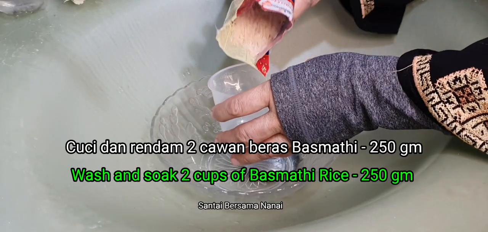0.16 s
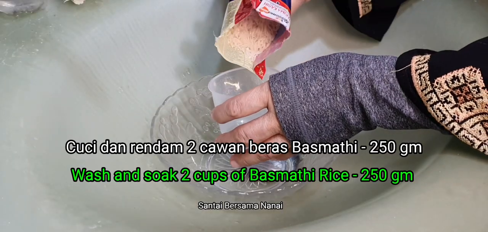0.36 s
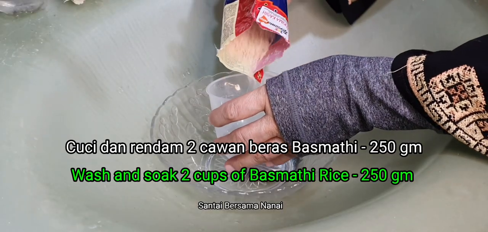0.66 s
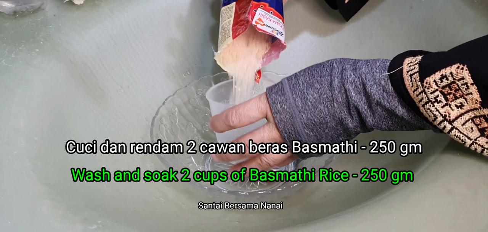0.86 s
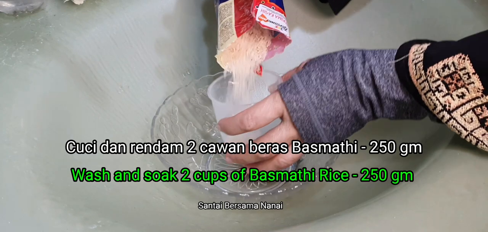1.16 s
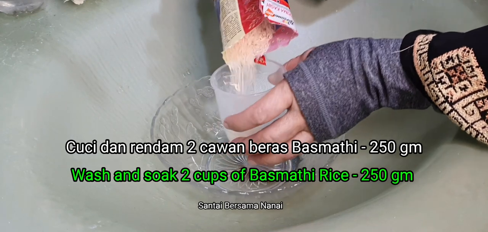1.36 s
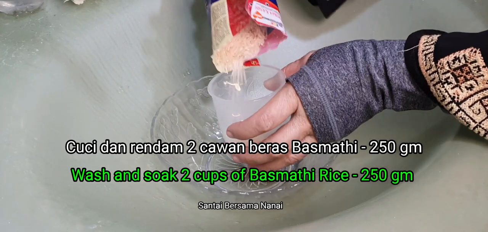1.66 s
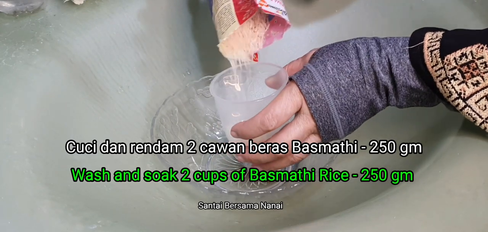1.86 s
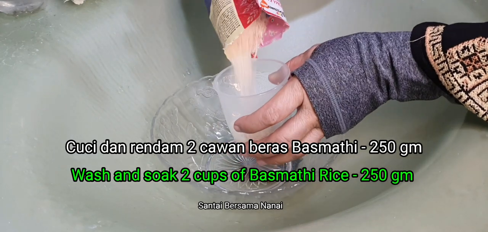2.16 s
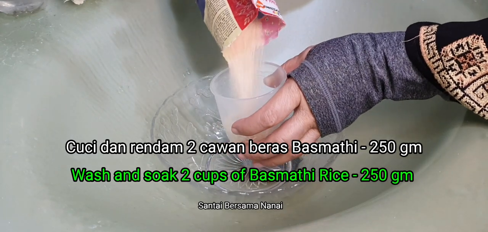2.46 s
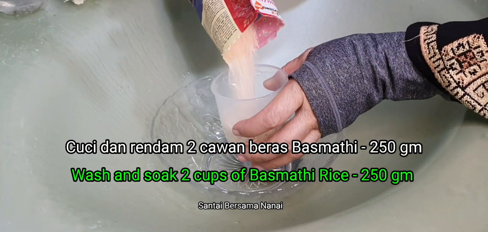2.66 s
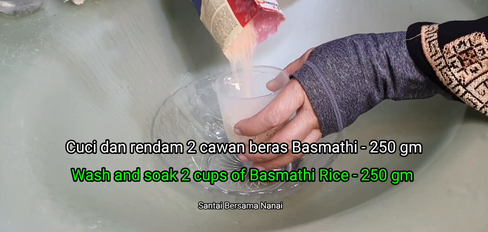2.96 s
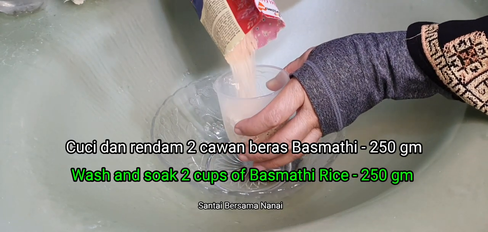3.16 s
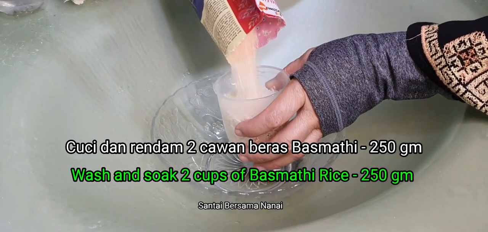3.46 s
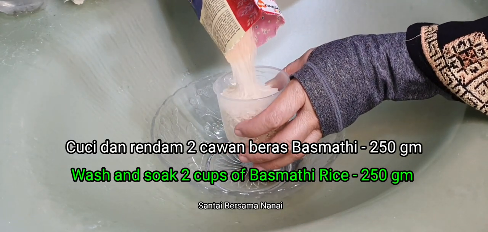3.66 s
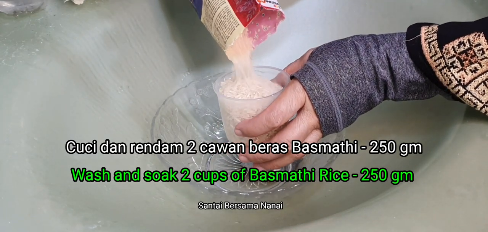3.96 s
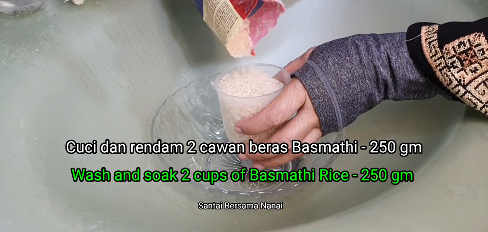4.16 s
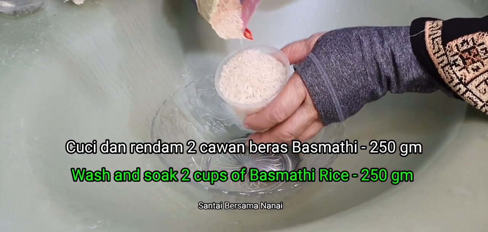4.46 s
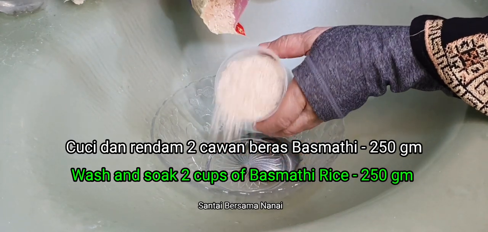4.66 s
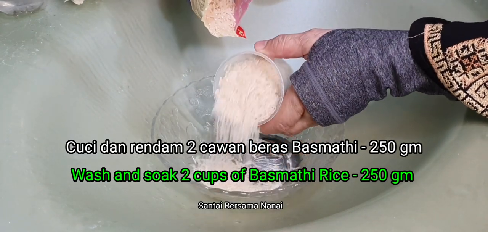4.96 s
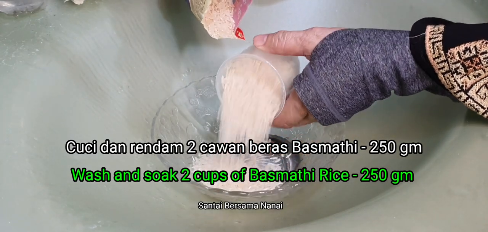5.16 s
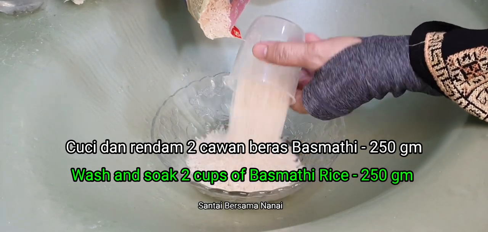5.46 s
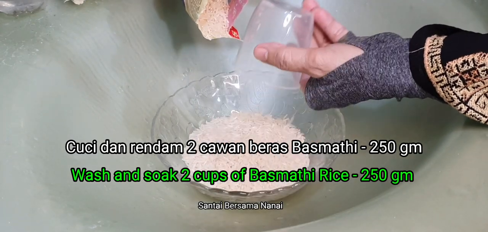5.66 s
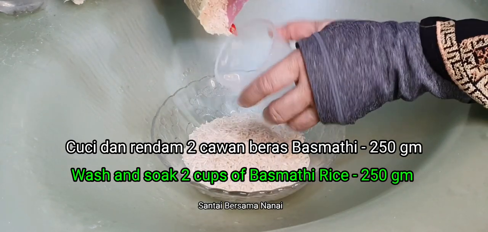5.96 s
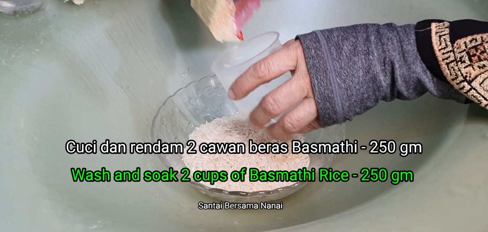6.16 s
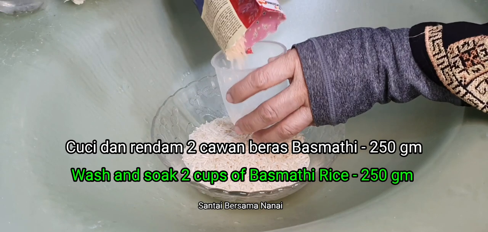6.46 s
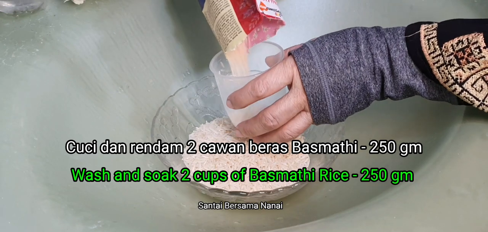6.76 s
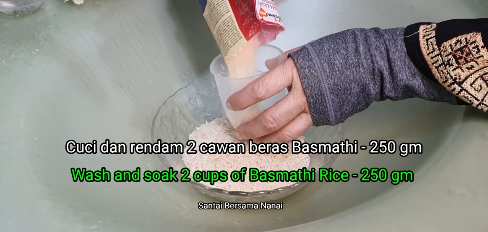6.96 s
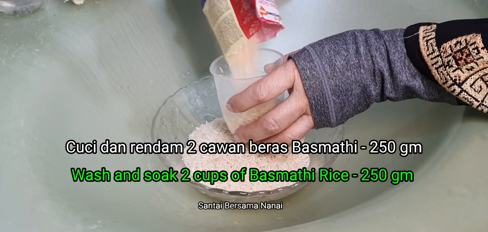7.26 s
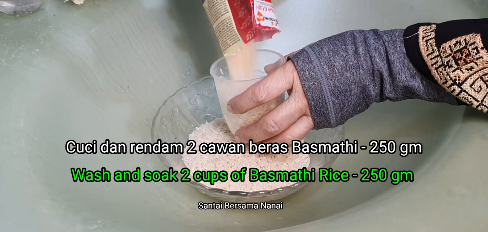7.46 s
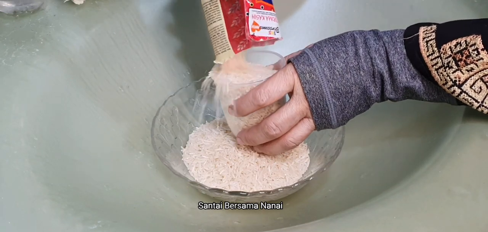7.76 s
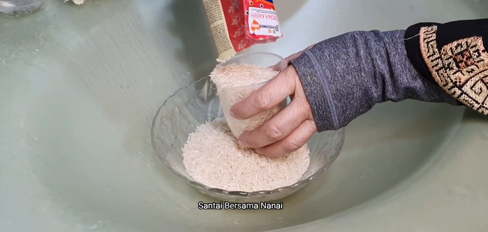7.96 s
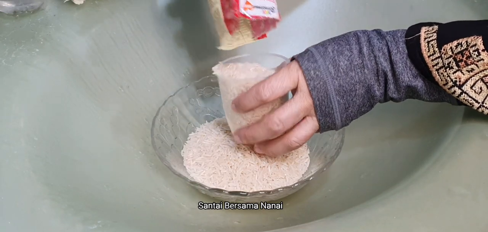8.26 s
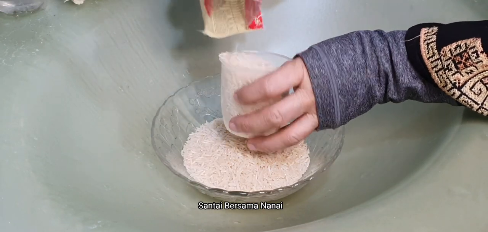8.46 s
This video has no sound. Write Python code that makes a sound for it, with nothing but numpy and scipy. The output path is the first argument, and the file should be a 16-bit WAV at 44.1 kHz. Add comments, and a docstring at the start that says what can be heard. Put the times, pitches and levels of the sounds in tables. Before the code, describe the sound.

Over a steady low hum, rice grains clatter into an empty plastic cup, settle to a hiss, spill into glass, then fill the cup again.

```python
"""Dry rice slides out of a cardboard box into a plastic cup held over a glass bowl in a kitchen basin.
The first grains ring the empty cup, later ones hiss on the heap; the cup is tipped into the bowl and filled again.
Random impacts excite resonators for cup, box and glass, and the basin adds early reflections.
Clumps, lone grains, snaps and knocks are placed singly; a mains hum of three sines and shaped room noise lie below."""
import sys
import numpy as np
from scipy import signal
from scipy.fft import rfft, irfft
from scipy.io import wavfile

SR = 44100
rng = np.random.default_rng(int(sys.argv[2]) if len(sys.argv) > 2 else 0)


def unload_wav(signal):
    """Save mono or channel-first audio to the path in sys.argv[1] as 16-bit WAV at rate SR, clipped to [-1, 1]."""
    wavfile.write(
        sys.argv[1],
        SR,
        np.round(np.clip(np.atleast_2d(signal).T, -1, 1) * 32767).astype(np.int16),
    )


N = 380141

# Spectrum of rice striking rice. Each row: frequency in Hz, relative density in dB per Hz.
RICE_SPECTRUM = [(500, -43.5), (900, -12), (2000, -2), (3800, 0.5), (5200, 0.5), (7000, 4), (8600, 5),
                 (10500, -1.5), (11500, -5.5), (12200, -7)]
# Rice shifting in the box and packing in the cup. Each row: time in seconds, level in dB.
RUSTLE_LEVEL = [(0, -48.5), (.16, -46.5), (.47, -55), (.85, -48), (1.55, -49.5), (1.83, -83), (2.19, -53.5),
                (2.61, -47), (3.18, -54), (3.6, -46), (4.22, -58), (4.38, -69.5), (5.04, -59.5),
                (6.56, -62.5), (7.01, -40.5), (7.33, -43), (7.74, -38.5), (8, -45), (8.12, -63),
                (8.45, -56.5), (8.62, -60.5)]
# Rice on the bare cup floor: first filling, second filling, emptying. Each row: time in seconds, level in dB.
RATTLE_LEVELS = [
    [(.9, -76), (.975, -49), (1.0, -35), (1.05, -29), (1.14, -18.5), (1.2, -25), (1.34, -33), (1.65, -50.5),
     (2.1, -76.5)],
    [(6.3, -73), (6.56, -46), (6.71, -37.5), (6.76, -21.5), (6.88, -36.5), (7.05, -34.5), (7.19, -49),
     (7.26, -77)],
    [(4.85, -68), (4.97, -49.5), (5.3, -55.5), (5.6, -51.5), (5.85, -67)],
]


def amp(db):
    """Level law: 20 dB is a factor of ten in amplitude."""
    return 10 ** (np.asarray(db) / 20)


def rms_one(x):
    """Normalization: the mean of the channels gets an effective value of 1."""
    mono = np.mean(np.atleast_2d(x), axis=0)
    return x / np.sqrt(np.mean(mono ** 2) + 1e-20)


def in_time(rows):
    """Envelopes: each column after the time is interpolated linearly to every sample."""
    s, *columns = np.transpose(rows)
    return [np.interp(np.arange(N) / SR, s, column) for column in columns]


def at_hz(points, hz):
    """Spectral envelope: values are interpolated along a logarithmic frequency axis."""
    point_hz, values = np.transpose(points)
    return np.interp(np.log(hz + 1), np.log(point_hz), values)


def sides(db):
    """Level difference between the ears: left and right gains for a lean to the left."""
    return amp(np.multiply.outer([.5, -.5], db))


def together(*levels_db):
    """Power addition: gain of unrelated sounds heard at once."""
    return np.sqrt(sum(amp(2 * db) for db in levels_db))


def drift(rate_hz):
    """Low-passed noise: a slow random fluctuation of effective value 1."""
    step = 40   # samples between the slow values
    r = np.exp(-2 * np.pi * rate_hz * step / SR)
    noise = rng.standard_normal(N // step + 2002)
    slow = signal.lfilter([1], [1, -2 * r, r * r], noise)[2000:]   # without the filter's onset
    return np.interp(np.arange(N) / step, np.arange(len(slow)), rms_one(slow))


def resonance(x, hz, width_hz):
    """Damped resonator: a pole pair whose radius sets the bandwidth."""
    r = np.exp(-np.pi * width_hz / SR)
    zeros = [(1 - r * r) / 2, 0, (r * r - 1) / 2]
    poles = [1, -2 * r * np.cos(2 * np.pi * hz / SR), r * r]
    return signal.lfilter(zeros, poles, x + 1e-18)


def modes(x, table):
    """Modal superposition: broad resonances side by side with alternating sign."""
    return sum((-1) ** k * amp(db) * resonance(x, hz, width_hz) for k, (hz, width_hz, db) in enumerate(table))


def coloured(x, spectrum):
    """Minimum-phase filtering: a causal filter takes the given spectrum."""
    hz = np.linspace(0, SR / 2, 200)
    # the minimum-phase step takes a square root, hence twice the level
    kernel = signal.minimum_phase(signal.firwin2(511, hz, amp(2 * at_hz(spectrum, hz)), fs=SR))
    return signal.oaconvolve(x, kernel[None], axes=1)[:, :N]


def basin(clicks, echo_db, count):
    """Early reflections: every landing spot has its own decaying echoes at either ear."""
    t60_s, right_lag = .042, 3.2   # decay time; lag of the direct sound at the right port in samples
    t = np.arange(int(.08 * SR)) / SR
    spot = rng.integers(0, count, N)
    out = 0
    for k in range(count):
        echoes = rng.standard_normal((2, len(t))) * amp(-60 * t / t60_s) * (t > .0003)
        paths = amp(echo_db) * echoes / np.linalg.norm(echoes, axis=1, keepdims=True)
        paths += np.sinc(t * SR - np.array([[1], [1 + right_lag]]))   # direct sound
        out = out + signal.oaconvolve((clicks * (spot == k))[None], paths, axes=1)[:, :N]
    return out


def grains(per_s, spread_db, clumps_db):
    """Shot noise: random impacts of uneven size and either sign, in clumps of level, land in the basin."""
    born = rng.random(N) < per_s / SR
    sizes = amp(spread_db * np.minimum(rng.exponential(1, N), 4)) * rng.choice([-1, 1], N)
    clumps = amp(clumps_db * (drift(3.3) + drift(21)))
    return basin(born * sizes * clumps, echo_db=5.5, count=7)


def room():
    """Partial coherence: steady rumble and air share more between the ears in the bass than higher up."""
    # Each row: frequency in Hz, relative density in dB per Hz.
    spectrum = [(20, -16), (45, -3), (90, 2), (125, -4), (160, -1), (200, -14), (300, -4), (400, -11.5),
                (800, -7.5), (1250, -11.5), (2000, -20.5), (4200, -39), (7400, -73), (12000, -133)]
    # Likeness of the ears. Each row: frequency in Hz, correlation from -1 to 1.
    likeness = [(30, 0.39), (60, 1), (270, 0.65), (450, 0.36), (900, -0.67), (2500, 0.1)]
    level_db = -46
    hz = np.arange(N // 2 + 1) * SR / N
    mid, side = rfft(rng.standard_normal((2, N))) * amp(at_hz(spectrum, hz))
    alike = np.clip(at_hz(likeness, hz), -1, 1)
    both = np.sqrt(1 + alike) * mid + np.sqrt(1 - alike) * side * [[1], [-1]]
    return amp(level_db) * rms_one(irfft(both, N))


def hum():
    """Harmonic series: multiples 1, 3 and 4 of the mains buzz swell slowly and waver a little."""
    # Each row: time in seconds, level of the fundamental in dB.
    fundamental = [(0, -44), (.7, -41), (1.5, -38), (2.0, -41.5), (2.3, -34.5), (3, -40), (4.2, -43),
                   (5, -51.5), (5.5, -42), (6, -39), (8.62, -32)]
    # Each row: time in seconds, level of multiple 3 in dB, level of multiple 4 in dB.
    overtones = [(0, -45, -101), (3, -47, -71), (6, -47.5, -59.5), (8.62, -50.5, -60.5)]
    # One entry a multiple: left over right in dB.
    leans_db = [3, -1, 7]
    buzz_hz = 100.1
    phase = 2 * np.pi * buzz_hz * np.arange(N) / SR
    out = 0
    for k, db, lean_db in zip([1, 3, 4], in_time(fundamental) + in_time(overtones), leans_db):
        level = np.sqrt(2) * amp(db + 0.13 * drift(14))   # effective value to peak
        out = out + sides(lean_db)[:, None] * level * np.sin(k * phase)
    return out


def knocks():
    """Damped oscillation: dull knocks of the box and hand are decaying sines; the one at 1.506 s has three pitches."""
    # Each row: start in seconds, peak level in dB, pitch in Hz, time to fall by 60 dB in seconds.
    thuds = [(.27, -32.5, 510, 0.044), (1.506, -32, 450, 0.06), (1.507, -31.5, 624, 0.055),
             (1.508, -34.5, 855, 0.028), (1.62, -31.5, 325, 0.044), (3.795, -35, 506, 0.022)]
    out = np.zeros(N)
    t = np.arange(int(.15 * SR)) / SR
    for s, peak_db, hz, t60_s in thuds:
        out[int(s * SR):][:len(t)] += amp(peak_db - 60 * t / t60_s) * np.sin(2 * np.pi * hz * t)
    return out


def bowl():
    """Driven thin modes: grains keep the glass ringing, and the heap damps the high modes more and more."""
    # Rice on the glass, one list a spill. Each row: time in seconds, relative level in dB.
    spills = [
        [(4.9, -93), (4.93, -47), (5.0, -41), (5.2, -49), (5.33, -56.5), (5.58, -47), (5.72, -60), (5.8, -97)],
        [(5.7, -97), (5.8, -60), (5.87, -60.5), (5.96, -92)],
        [(7.92, -109), (8.0, -48), (8.07, -63), (8.16, -63), (8.4, -74)],
    ]
    # Modes of the glass. Each row: frequency in Hz, width in Hz, relative level in dB.
    glass = [(1640, 25, -14), (2800, 40, -10), (3350, 40, -15), (4250, 200, -9), (4460, 30, 0),
             (4650, 30, -5), (4770, 25, -6), (5950, 50, -12), (6730, 40, -7), (6840, 50, -5),
             (7170, 35, -1), (7650, 150, -9), (8020, 35, -2), (8740, 45, -9), (9100, 50, -4),
             (9680, 30, -6), (10200, 60, -5), (10800, 80, -7), (11200, 70, -10)]
    first_damping_db, damping_growth_db = -2, 15.5   # per octave at the start; per octave and second
    blows = grains(3000, spread_db=2.0, clumps_db=0)
    t = np.arange(N) / SR
    states = []
    for rows in spills:
        since_s = np.clip(t - rows[0][0], 0, 1)   # the damping grows for one second
        states.append((in_time(rows)[0], first_damping_db + damping_growth_db * since_s))
    out = 0
    for hz, width_hz, db in glass:
        octaves = np.log2(hz / 4500)
        level = sum(amp(level_db - damping_db * octaves) for level_db, damping_db in states)
        swell = amp(db - 8 + 2.3 * drift(11))
        power = np.sqrt(width_hz / 50)   # a wider mode takes up more of the noise
        out = out + level * swell * power * rms_one(resonance(blows, hz, width_hz))
    return out


def cup(x):
    """Modal beating: neighbouring modes start in opposite phase, so a blow swells for a moment."""
    # Air and floor of the cup. Each row: frequency in Hz, width in Hz, gain in dB, factor on the right.
    air_and_floor = [(1042, 98, 6.5, 0.19), (1242, 62, 11, -0.2), (1304, 99, 5, 0.072),
                     (1500, 87, -9, -0.099)]
    rings = sum((-1) ** k * amp(db) * resonance(x, hz, width_hz) * [[1], [right]]
                for k, (hz, width_hz, db, right) in enumerate(air_and_floor))
    # little radiates below the first mode
    return signal.sosfilt(signal.cheby1(5, 1, 1047, "high", fs=SR, output="sos"), rings)


def walls_gain():
    """Sympathetic ringing: the walls follow the rattle on the bare floor."""
    # One entry a rattle: level of the walls relative to it in dB.
    under_rattle_db = [-5, -11.5, -25]
    return together(*[in_time(rows)[0] + db for rows, db in zip(RATTLE_LEVELS, under_rattle_db)])


def box(x):
    """Power sharing of resonators: cardboard and packed rice sound dull, the bare cup walls brighter."""
    # Box and packed rice. Each row: frequency in Hz, width in Hz, gain in dB.
    packed = [(886, 300, 2), (1858, 275, 7), (2685, 496, 5.5), (2670, 120, -10), (3440, 470, -7)]
    # Thin walls of the empty cup. Each row: frequency in Hz, width in Hz, gain in dB.
    thin_walls = [(2740, 270, 6), (3290, 280, 7), (3490, 100, 9), (3990, 270, 5.5), (4660, 310, 4),
                  (6310, 400, 1.5)]
    bare = 1 / (1 + (amp(in_time(RUSTLE_LEVEL)[0]) / walls_gain()) ** 2)   # share of the walls in the power
    no_body = signal.butter(2, 2600, "high", fs=SR, output="sos")
    walls = signal.sosfilt(no_body, modes(x, thin_walls))
    return np.sqrt(1 - bare) * modes(x, packed) + np.sqrt(bare) * walls


def ticks(x):
    """Contact spectrum: a blow of rice on rice is a short coloured click."""
    return coloured(x, RICE_SPECTRUM)


def hits():
    """Impulse response: clumps ring cup and walls and tick, lone grains tick, snaps sound in box and cup."""
    # Clumps on the bare cup floor. Each row: time in seconds, relative ring in dB, relative tick in dB.
    clumps = [(.817, -20, -27.5), (.895, -27.5, -35.5), (.945, -26, -30), (0.978, -24, -30),
              (0.994, -21, -40), (1.005, -12.5, -22), (1.021, -22.5, -24.5), (1.052, -6, -22),
              (1.064, -14.5, -25), (1.099, -28, -40), (1.156, -10, -22), (1.311, -21, -30),
              (6.102, -43, -53), (6.16, -46, -45.5), (6.209, -47, -39), (6.286, -43, -34), (6.33, -44, -30),
              (6.362, -40.5, -34), (6.41, -35.5, -43), (6.465, -31, -31), (6.5, -30.5, -40),
              (6.588, -18, -27), (6.63, -23, -30), (6.655, -21.5, -34), (6.672, -16, -29),
              (6.721, -21, -23), (6.733, -20, -27), (6.752, -17, -22.5), (6.775, -20, -25),
              (6.94, -18, -50), (7.025, -21.5, -25)]
    # Lone grains on the heap. Each row: time in seconds, relative peak level in dB.
    lone_grains = [(.964, -25), (1.506, -23), (1.798, -36), (1.879, -34.5), (1.966, -40), (2.086, -35),
                   (2.204, -31.5), (2.285, -38), (2.344, -31), (3.685, -29), (4.098, -47), (4.181, -42),
                   (4.244, -44), (4.301, -51), (6.06, -59), (6.255, -46), (6.538, -37.5), (8.177, -42)]
    # Snaps of box and cup wall in the hands. Each row: time in seconds, in the box in dB, in the cup in dB.
    snaps = [(.176, -33, -45), (0.621, -39, -47), (0.963, -26, -53), (1.228, -15, -25), (1.506, -22.5, -43),
             (3.276, -31.5, -32), (3.685, -37, -43), (8.24, -55, -55), (8.345, -44, -55), (8.411, -40, -50),
             (8.463, -41.5, -53), (8.519, -38, -46)]
    cup_blows = [(s, db) for s, db, _ in clumps] + [(s, db) for s, _, db in snaps]
    # the walls ring less under the clumps of the second filling, after 5 s
    wall_blows = [(s, db + (-12.5 if s > 5 else -2.5)) for s, db, _ in clumps]
    box_blows = wall_blows + [(s, db) for s, db, _ in snaps]
    tick_blows = [(s, db) for s, _, db in clumps] + list(lone_grains)
    # body, gain in dB, echo in dB, blows
    bodies = [(cup, 6, -4.5, cup_blows), (box, 3, 1.5, box_blows), (ticks, 10, 4, tick_blows)]
    unit = signal.unit_impulse((1, N))
    out = 0
    for body, gain_db, echo_db, blows in bodies:
        s, peak_db = np.transpose(blows)
        clicks = np.zeros(N)
        clicks[(s * SR).astype(int)] = amp(peak_db + gain_db) / np.max(np.abs(body(unit)))
        out = out + body(basin(clicks, echo_db, count=8))
    return out


def spurts():
    """Transient flow: as the hand shakes rice loose, the level in dB rises fast and falls more slowly."""
    # Each row: time of the peak in seconds, level in dB.
    peaks = [(.82, -51), (.9, -51), (1.68, -45.5), (1.759, -44.5), (1.9, -53), (1.99, -50), (2.12, -51),
             (2.21, -49), (2.49, -48), (2.612, -34.5), (2.96, -47), (3.2, -55.5), (3.34, -47), (3.41, -44),
             (3.7, -41), (3.93, -47), (4.79, -57.5), (4.93, -49.5), (6.32, -47), (6.59, -41.5),
             (6.73, -40.5)]
    rise_db_per_s, fall_db_per_s = 311, 111
    t = np.arange(N) / SR
    return np.max([db - np.maximum(rise_db_per_s * (s - t), fall_db_per_s * (t - s)) for s, db in peaks], axis=0)


def stream():
    """Granular flow: dense ticks on the heap, rustle in the box and the ring of the cup while its floor is bare."""
    # Rice on rice while filling, tipping out and filling again. Each row: time in seconds, level in dB.
    flows = [
        [(0, -62), (.57, -85), (.93, -62), (.98, -44.5), (1.07, -29.5), (1.42, -38), (1.63, -48.5),
         (2.33, -52.5), (2.42, -42.5), (3.2, -46), (4.2, -52), (4.35, -63), (4.7, -83)],
        [(4.76, -106), (4.78, -58.5), (5.34, -54), (5.67, -47.5), (5.83, -57.5), (5.89, -76)],
        [(6.12, -85), (6.2, -57), (6.54, -59.5), (6.72, -43), (7.19, -32), (7.55, -41), (7.82, -39.5),
         (7.94, -49.5), (8.07, -51), (8.23, -67), (8.4, -82), (8.62, -62)],
    ]
    full_flow_db, thinnest = -39.5, .15   # level of the densest stream; least share of its grains
    cup_under_rustle_db = -6   # the filled cup still hums with what lands in it
    flow = together(spurts(), *[in_time(rows)[0] for rows in flows])
    # the tipped cup sheds a wide, soft sheet that is dense at a level 14 dB lower
    full_db = full_flow_db - 14 * (in_time(flows[1])[0] > -70)
    dense = np.clip(flow / amp(full_db), thinnest, 1)   # a thin stream holds fewer grains
    falling = grains(4500 * dense, spread_db=4.0, clumps_db=0.28)
    heap = rms_one(ticks(falling) / np.sqrt(dense))
    rustle = rms_one(box(grains(900, spread_db=2.0, clumps_db=1.0)))
    rattle = rms_one(cup(grains(900, spread_db=1.5, clumps_db=1.87)))
    rustle_db, = in_time(RUSTLE_LEVEL)
    rustle_gain = np.hypot(amp(rustle_db), walls_gain())
    rattle_gain = together(rustle_db + cup_under_rustle_db, *[in_time(rows)[0] for rows in RATTLE_LEVELS])
    return flow * heap + rustle_gain * rustle + rattle_gain * rattle


def scene():
    """Superposition: all sources add at the two ears."""
    return stream() + bowl() + hits() + knocks() + hum() + room()


def record(dry):
    """Directivity, saturation and band limit: sound above 700 Hz leans mostly left, peaks are rounded, the top is cut."""
    # Each row: frequency in Hz, left over right in dB.
    lean = [(60, 3.0), (110, 3.0), (190, 1.0), (350, -1.5), (620, 4.5), (1120, -2), (2010, 3.5), (3620, 2),
            (6490, 7.5), (11700, 2)]
    hz = np.arange(N // 2 + 1) * SR / N
    leaning = irfft(rfft(dry) * sides(at_hz(lean, hz) * (hz > 700)), N)
    rounded = .85 * np.tanh(leaning / .85)
    return signal.sosfilt(signal.cheby2(14, 60, 12200, fs=SR, output="sos"), rounded)


dry = scene()
out = record(dry)
unload_wav(out)
```